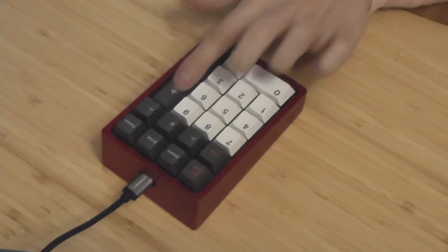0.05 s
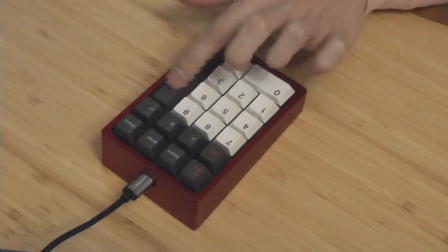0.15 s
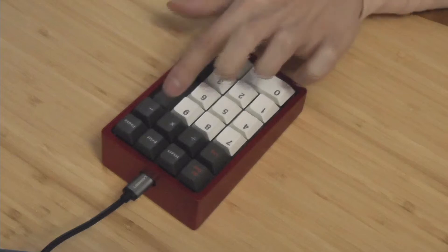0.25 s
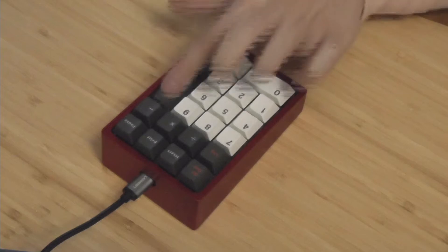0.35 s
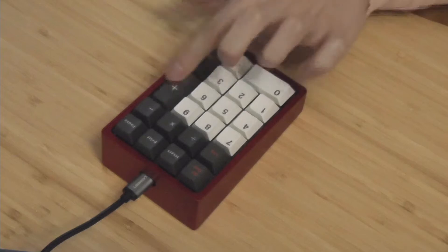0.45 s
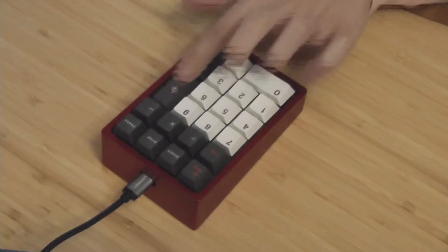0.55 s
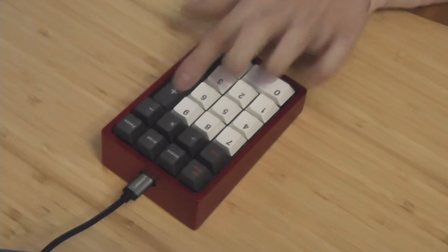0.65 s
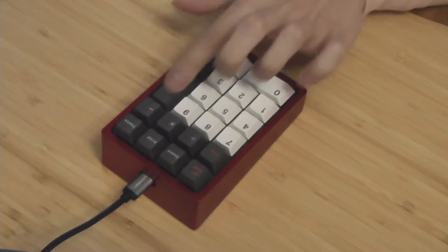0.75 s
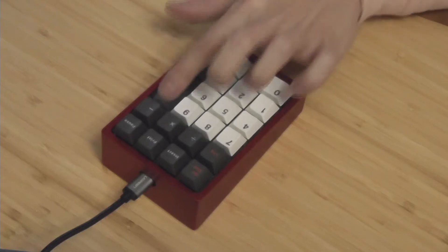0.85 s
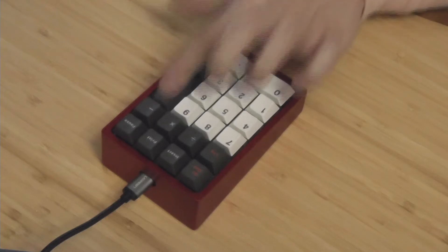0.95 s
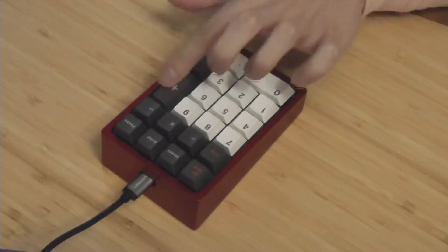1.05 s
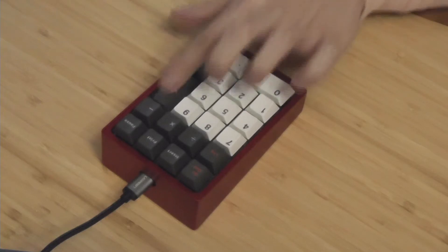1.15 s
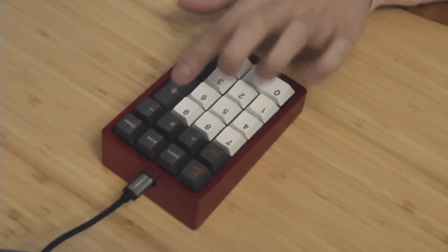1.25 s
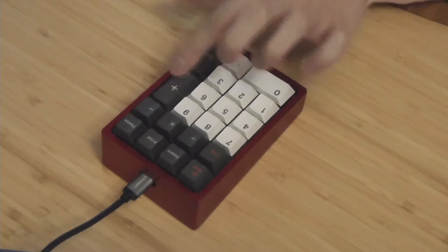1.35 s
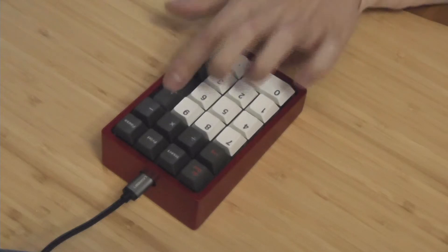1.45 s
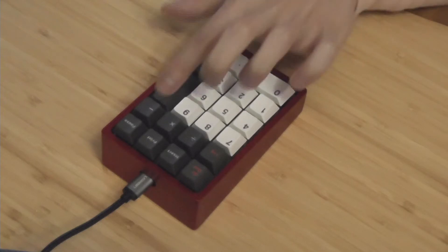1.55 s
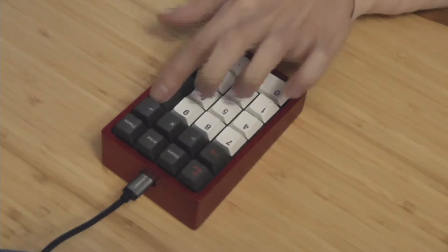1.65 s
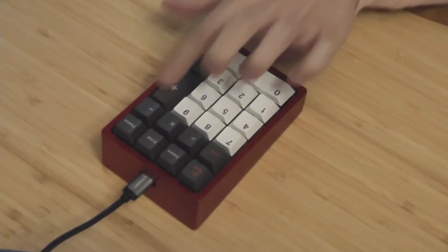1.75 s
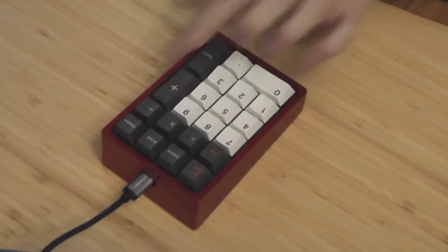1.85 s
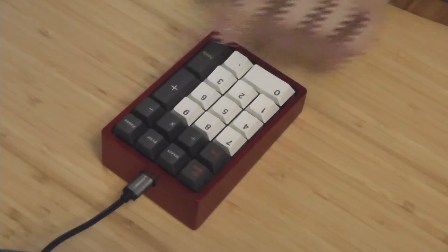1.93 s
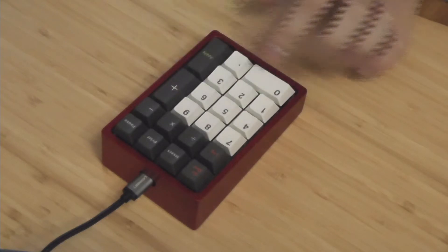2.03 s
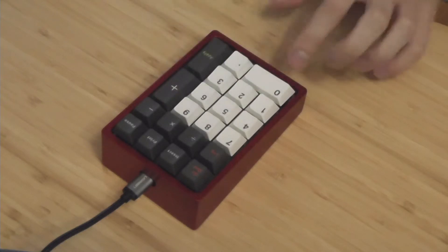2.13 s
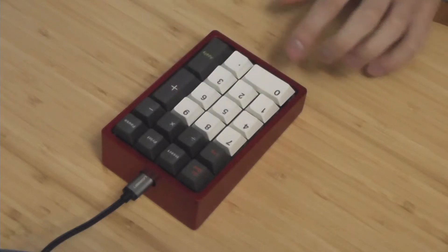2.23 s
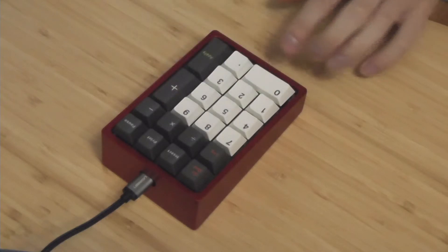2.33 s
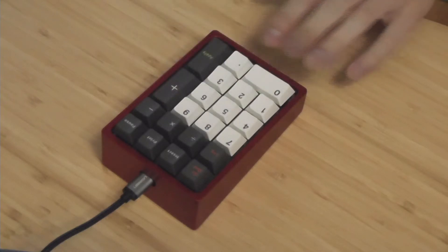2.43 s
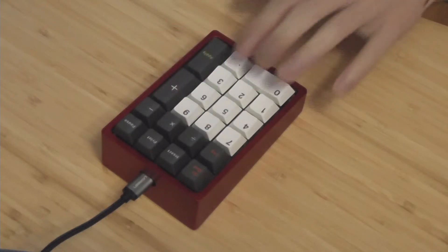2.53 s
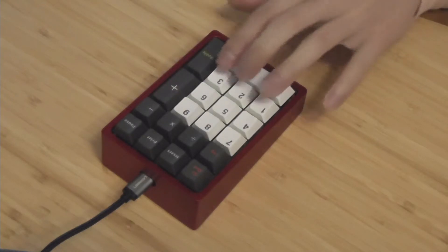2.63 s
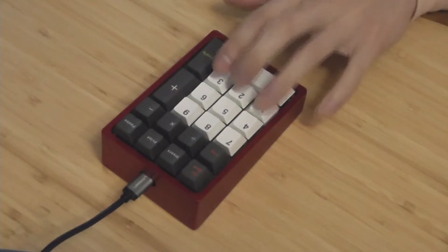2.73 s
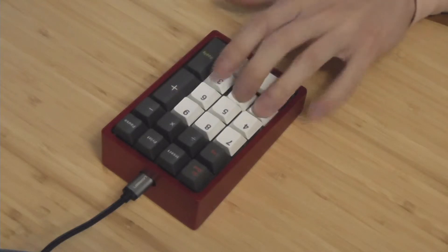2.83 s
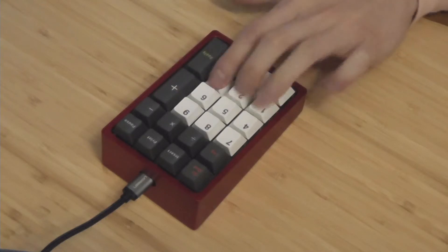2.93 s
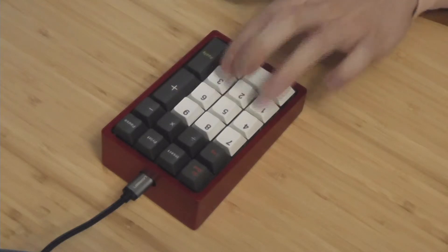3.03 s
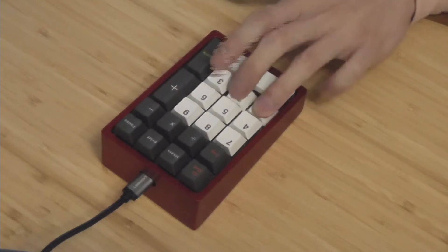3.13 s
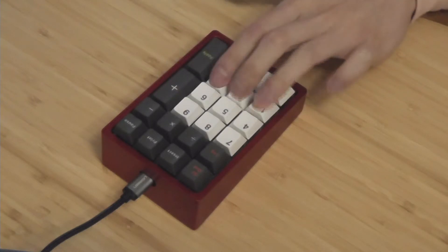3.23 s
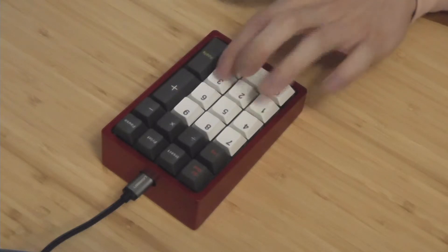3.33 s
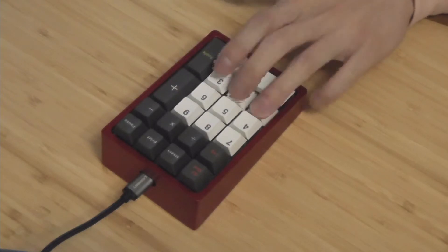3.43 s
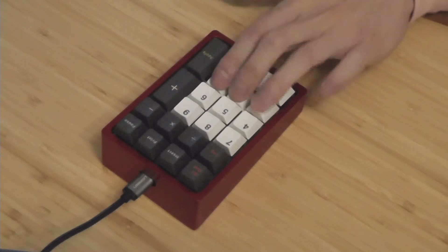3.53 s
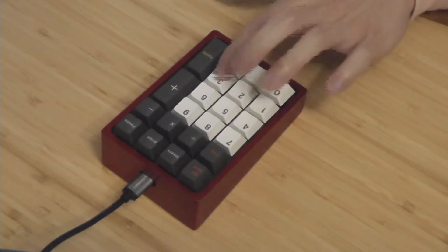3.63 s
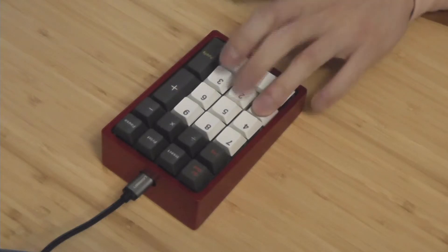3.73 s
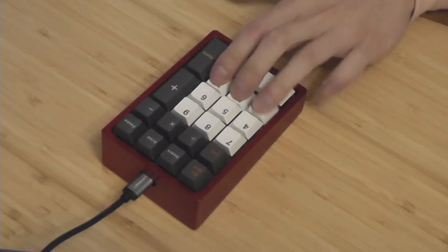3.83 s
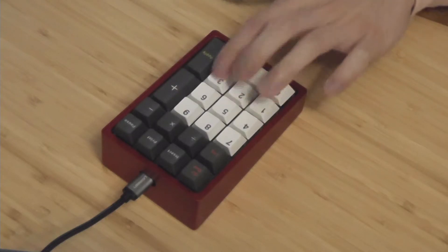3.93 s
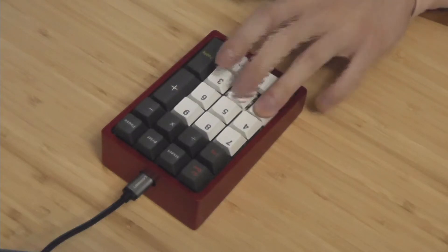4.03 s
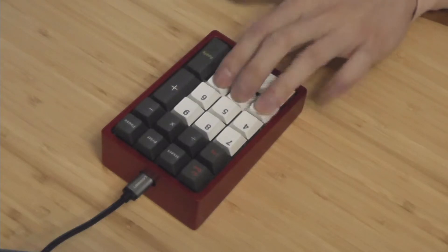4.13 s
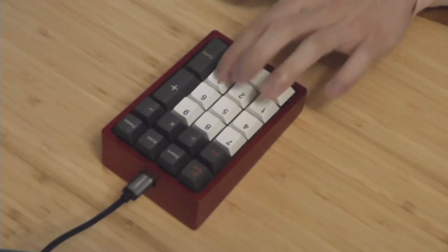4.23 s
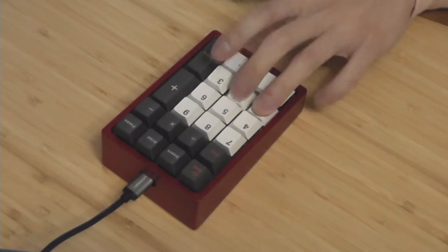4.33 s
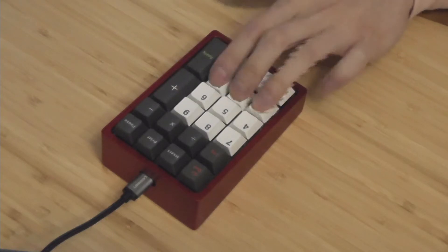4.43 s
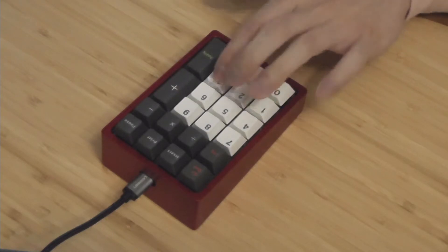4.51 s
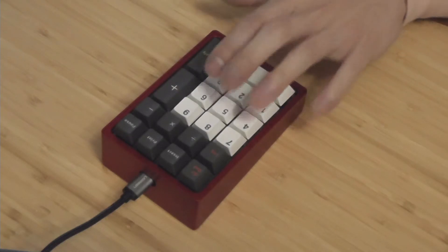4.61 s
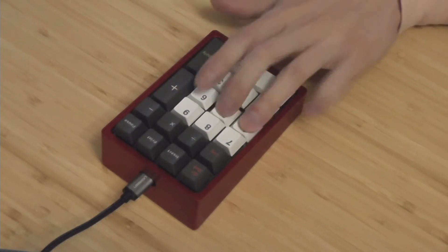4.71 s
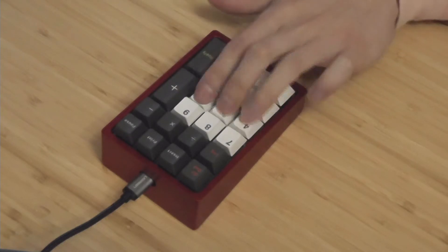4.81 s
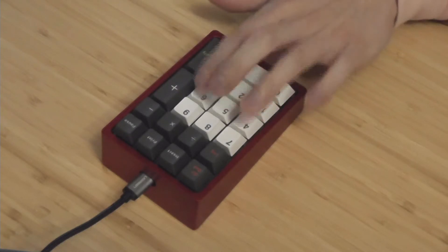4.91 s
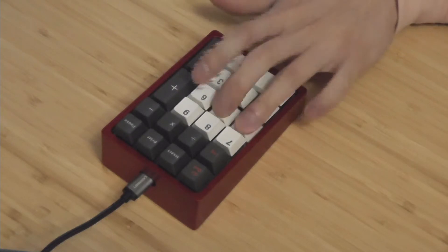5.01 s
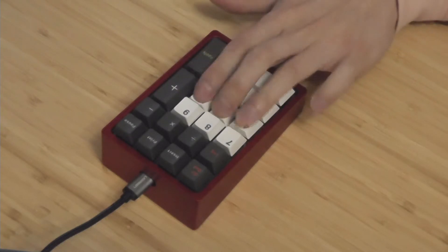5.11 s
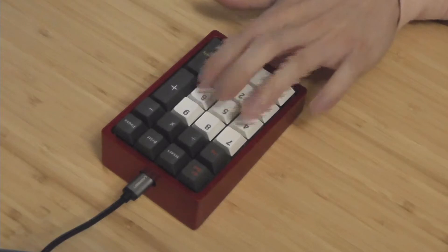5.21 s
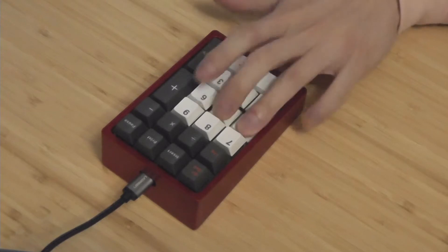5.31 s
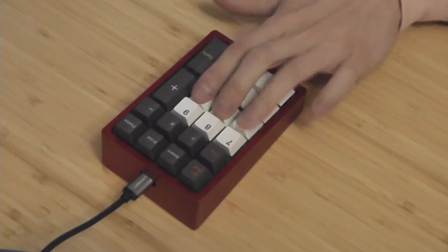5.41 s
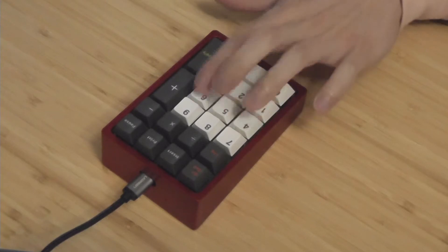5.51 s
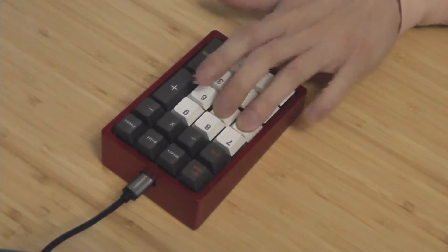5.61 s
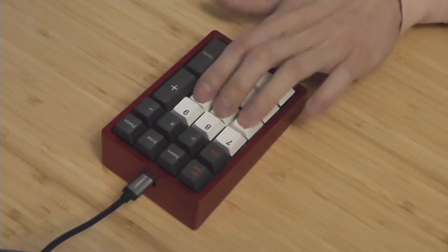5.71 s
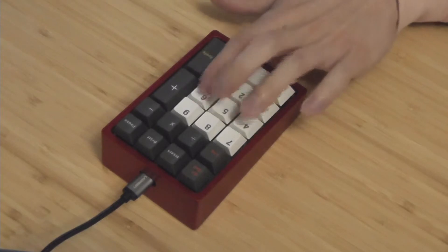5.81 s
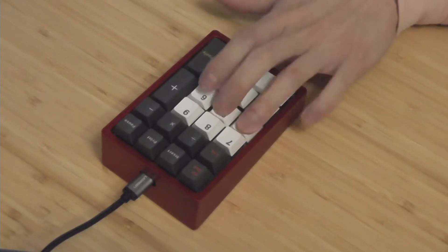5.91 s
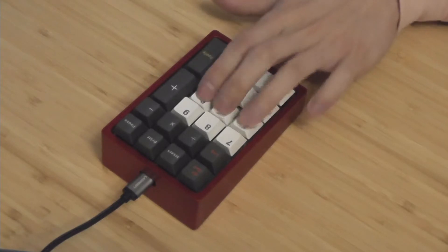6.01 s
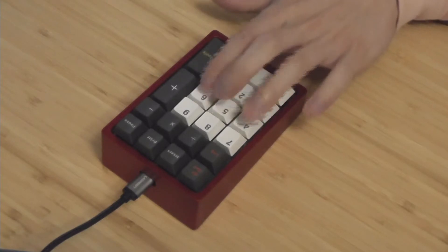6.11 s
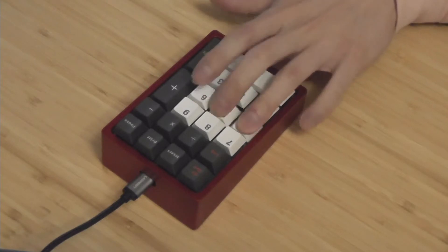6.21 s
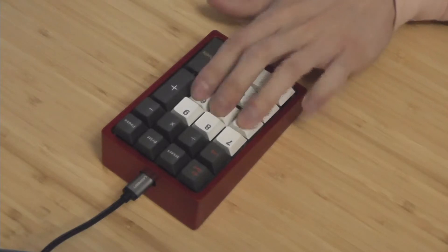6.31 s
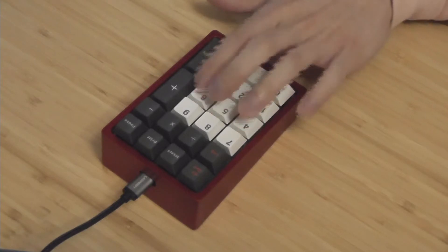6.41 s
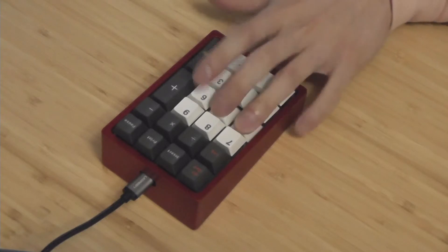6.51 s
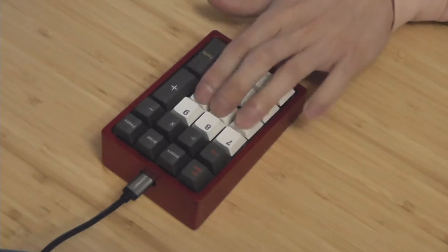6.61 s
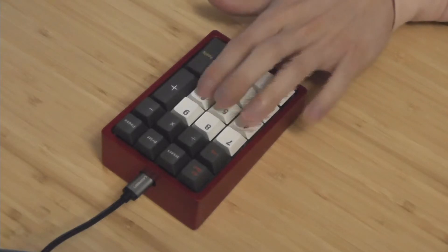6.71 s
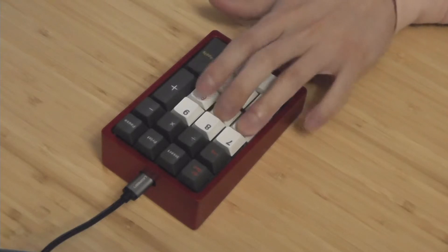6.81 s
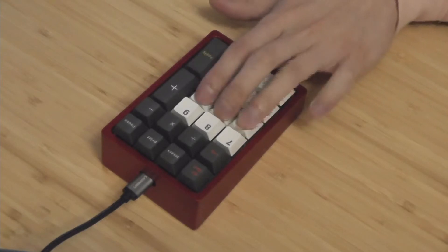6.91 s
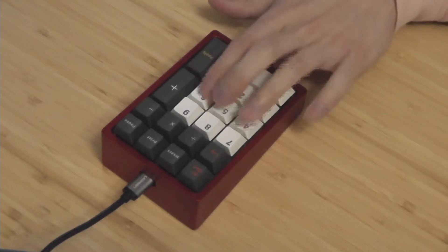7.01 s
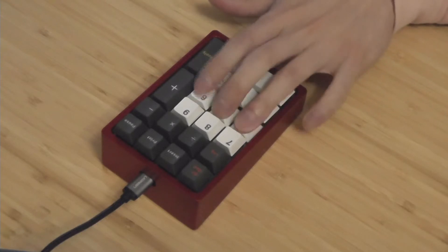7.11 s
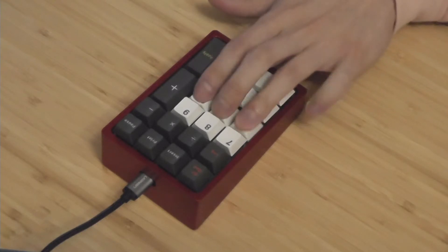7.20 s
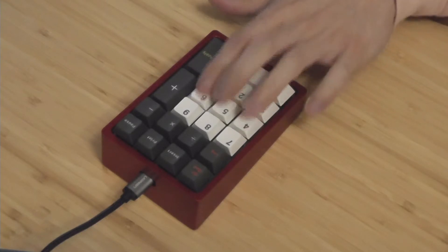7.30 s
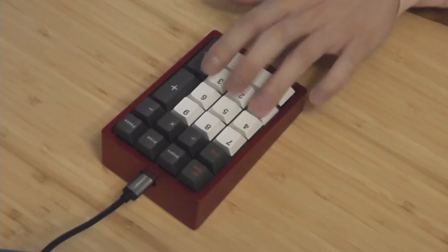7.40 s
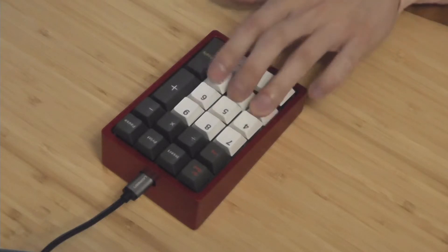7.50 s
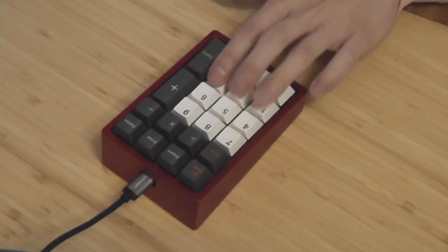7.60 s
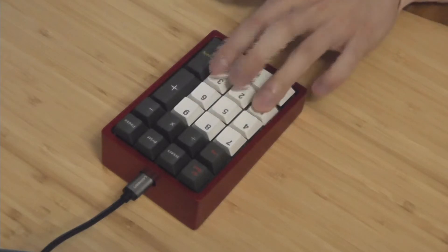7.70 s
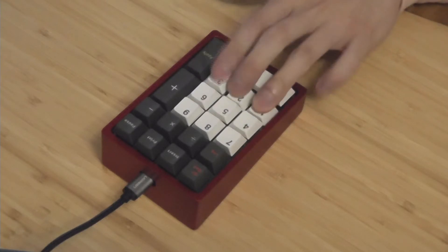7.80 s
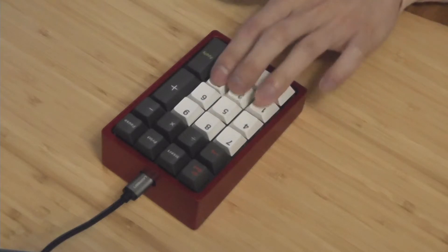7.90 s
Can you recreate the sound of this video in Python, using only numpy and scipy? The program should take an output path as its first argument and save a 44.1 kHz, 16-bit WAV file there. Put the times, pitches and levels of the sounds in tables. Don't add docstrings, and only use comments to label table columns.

```python
import sys
import numpy as np
from scipy import signal
from scipy.fft import rfft, irfft, next_fast_len
from scipy.io import wavfile
from scipy.ndimage import uniform_filter1d, map_coordinates

SR = 44100
rng = np.random.default_rng(int(sys.argv[2]) if len(sys.argv) > 2 else 0)


def to_wav(sig):
    pcm = np.clip(np.atleast_2d(sig), -1, 1) * 32767
    pcm = np.round(pcm).astype(np.int16)
    wavfile.write(sys.argv[1], SR, pcm.T)


def level_to_linear(level):
    exponent = np.asarray(level, float) / 20
    return 10 ** exponent


N = 350595

# frequency in Hz, width in Hz, level in dB.
CLACK_MODES = [(1750, 810, -4), (1890, 298, 0.5), (2230, 11, -21), (2430, 120, -9), (2770, 35, -8),
               (3910, 3040, -9)]
# frequency in Hz, width in Hz, level in dB.
CAP = [(4150, 70, -0.5), (4960, 1500, -6.5), (6390, 1210, 0), (6540, 2330, -3.5)]
# frequency in Hz, width in Hz, level in dB.
SPRING = [(8920, 310, 1), (10070, 830, 0.5), (11000, 590, -4)]
# frequency in Hz, width in Hz, level in dB.
BOARD = [(44, 51, -2), (80.05, 11.2, 0.5), (145.5, 20, -3), (168, 26.3, -4), (276, 16, -10), (363, 38, -38)]
# frequency in Hz, width in Hz, level in dB.
PANEL = [(244.8, 27, 1), (266.6, 36, -0.5), (362.5, 12.7, 0), (452, 250, -16.5), (558, 49, -10),
         (950, 1200, -18.5)]
# frequency in Hz, width in Hz, level in dB.
WIDE_CAP = [(3720, 390, -0.5), (4820, 1300, -2), (5220, 420, -3.5), (5660, 170, -2), (6900, 1500, -9.5)]
# frequency in Hz, width in Hz, level in dB.
WIRE = [(8330, 220, -1), (9630, 310, -6.5), (11400, 1700, -10.5)]
# frequency in Hz, width in Hz, level in dB.
EDGE = [(10990, 2200, -8.5), (15400, 1200, -10.5)]
# delay in seconds, level in dB.
NEAR_ECHO = (.00579, -7.5)

# time in seconds, sway in dB.
HAND_SWAY = [(0, -30.5), (.2, -48), (.26, -41), (.9, -36), (1.0, -42), (1.15, -39), (1.35, -36),
             (1.53, -45.5), (1.72, -34.5), (1.92, -47.5), (2.32, -66), (2.8, -48.5), (2.92, -80),
             (3.3, -42), (5.4, -42), (6.33, -46), (7.5, -59), (7.95, -46)]
# time in seconds, strength in dB.
PALM_RUB = [(0.0, -60), (0.26, -64), (1.26, -67), (1.55, -66.5), (1.88, -86.5), (2.48, -84), (2.68, -81),
            (2.79, -67), (3.54, -66), (3.74, -70.5), (4.45, -72.5), (4.67, -72), (5.4, -75.5), (6.24, -75),
            (6.53, -77), (7.95, -79)]
# start in seconds, clack peak in dB, clack in Hz, tick in dB, thump in dB.
BRUSH = [
    (2.568, -68, 1390, -38.5, 6),
    (7.284, -56, 1500, -19, -9),
    (7.313, -57.5, 2700, -34, 10),
]
# start in seconds, clack peak in dB, clack in Hz, tick in dB, thump in dB.
WIDE_PRESS = [(0.013, -39.5, 1940, 1, 6.5), (0.028, -23, 1890, -14.5, -10), (0.1147, -21, 2430, -7.5, -15),
              (0.2596, -17.5, 1890, -4.5, -12.5), (0.3221, -23, 1910, -17, -14.5),
              (.389, -16, 2430, -10, -16.5), (0.4588, -24.5, 1890, -11.5, -11),
              (0.5475, -15.5, 2430, -9, -17.5), (0.6792, -34.5, 2440, -7.5, -8.5),
              (0.701, -24, 1810, -14, -16), (.7693, -27.5, 1830, -9.5, -6), (0.851, -31.5, 3800, -6, -10),
              (0.8591, -15, 3100, -3.5, -12), (0.9845, -37.5, 2180, -3, 0.5),
              (0.9981, -22.5, 2310, -10.5, -14), (1.0602, -50.5, 2400, -35.5, 6),
              (1.3087, -18.5, 2430, -11, -11.5), (1.5487, -24.5, 1890, -17, -11.5)]
# start in seconds, clack peak in dB, clack in Hz, tick in dB, thump in dB.
FIRM_PRESS = [(2.592, -53.5, 1400, -26.5, 5), (2.614, -49, 1870, -23, -3.5),
              (2.7152, -40, 1900, -12.5, 1.5), (2.761, -25.5, 2580, -6.5, -5.5),
              (2.856, -29.5, 1810, -21, -8), (2.951, -24, 2770, -11, -6), (3.0771, -33, 1960, -8, 0),
              (3.2747, -30.5, 2400, -13, 2), (3.3146, -39, 2700, -7, 6), (3.4003, -26.5, 2400, -7, -7.5),
              (3.5015, -29.5, 2450, -20, -18), (3.5968, -31, 2420, -14, 5), (3.64, -27.5, 3220, -7, -1.5),
              (3.7036, -33.5, 2900, -9, -9), (3.81, -26, 2610, -16.5, -12),
              (3.8995, -23.5, 2450, -9, -11.5), (3.9257, -36.5, 2180, -14, -4.5),
              (3.9838, -37.5, 2770, -19, -3), (4.1103, -28, 2400, -18, -9.5),
              (4.1828, -25.5, 2500, -12.5, -6.5), (4.2283, -39.5, 2780, -8.5, 4),
              (4.289, -31.5, 2550, -9, -4), (4.3322, -40.5, 2700, -23, 5.5),
              (4.4014, -33, 1660, -16.5, -11)]
# start in seconds, clack peak
# in dB, clack in Hz, tick in dB, thump in dB.
EASY_PRESS = [(4.56, -18.5, 2510, -11.5, -8), (4.656, -45.5, 1860, -29, 9), (4.7011, -42.5, 1800, -32, 1.5),
              (4.91, -43, 2400, -20.5, -2), (4.9918, -55, 1940, -18, 16.5), (5.0124, -36.5, 1700, -31, -6),
              (5.1689, -33, 2590, -28, -1.5), (5.2115, -43.5, 1800, -10.5, 8),
              (5.2796, -49, 2770, -12.5, 10), (5.328, -51, 3100, -23, -14),
              (5.3989, -28.5, 1890, -16.5, -17), (5.4808, -21.5, 2720, -10.5, -5),
              (5.566, -47, 2700, -21, -5), (5.6267, -40, 2770, -27, -24), (5.769, -29.5, 2580, -20.5, -11),
              (5.8188, -44, 1890, -17, 6), (5.8525, -50, 2160, -21, 8), (5.9174, -45.5, 2770, -37, -2.5),
              (5.951, -35.5, 2430, -23, -8.5), (5.9898, -27.5, 1890, -42, -21),
              (6.067, -50.5, 2770, -26, 9.5), (6.3766, -33, 2540, -12, -3.5), (6.4312, -51, 3140, -8, 14),
               (6.4617, -42.5, 1890, -23, -8), (6.522, -45.5, 1750, -45, -5.5), (6.559, -38, 2540, -41, -9),
               (6.6728, -34.5, 2740, -26, -11), (6.7485, -45.5, 2700, -19, -3.5),
               (6.9519, -33.5, 2570, -13, -10.5), (7.0124, -46.5, 3000, -6, -1),
               (7.072, -56.5, 2770, -18, 11.5), (7.1276, -42, 1780, -45, -9), (7.4349, -43, 2560, -32, -31),
               (7.5486, -40.5, 2500, -45, -15), (7.5775, -54, 2740, -39, -1),
               (7.6656, -35, 2150, -22.5, -13), (7.6947, -45, 2640, -44, 0.5),
               (7.723, -42.5, 2200, -25, -20), (7.801, -41, 2230, -59, -22)]
# start in seconds, clack peak in dB, clack in Hz, tick in dB.
LIGHT_STROKES = [(0.177, -24.5, 1830, -16), (.624, -28.5, 1870, -19), (.923, -30, 1890, -14.5),
                 (1.1565, -25, 2430, -17.5), (1.2279, -21.5, 3330, -9), (1.383, -37, 1720, -18),
                 (1.4278, -36.5, 1890, -16.5), (1.6292, -34, 1880, -10), (2.638, -28, 2440, -16),
                 (2.8193, -27, 2430, -18.5), (3.0169, -31.5, 2760, -9.5), (3.1069, -36.5, 2600, -19),
                 (3.1439, -31.5, 1720, -25), (3.1858, -33, 2540, -26.5), (3.462, -27, 2580, -11.5),
                 (3.743, -37.5, 1890, -15.5), (3.777, -30.5, 2400, -16.5), (4.036, -38.5, 2180, -21),
                 (4.074, -29.5, 2400, -20.5), (4.3633, -36, 2230, -29), (4.679, -49, 2240, -24),
                 (4.745, -32, 2410, -11), (4.7845, -28.5, 1890, -24), (4.8729, -32.5, 2600, -33),
                 (5.06, -33, 2460, -22.5), (5.097, -26.5, 1890, -17), (5.3625, -33.5, 2500, -12),
                 (5.5924, -56, 2770, -27), (5.6522, -30.5, 2230, -11.5), (5.708, -28.5, 1890, -28),
                       (6.1027, -38.5, 1900, -21.5), (6.1284, -47.5, 1890, -19.5), (6.2228, -38.5, 1760, -32),
                       (6.262, -41, 1710, -31), (6.291, -31.5, 1890, -23.5), (6.6023, -31.5, 1890, -40),
                       (6.648, -44, 2640, -21), (6.8082, -37.5, 1850, -48), (6.849, -36, 1890, -31.5),
                       (6.9038, -40.5, 1890, -43), (7.1515, -38.5, 2330, -17), (7.2021, -34, 1930, -23.5),
                       (7.3586, -34.5, 2320, -19), (7.4535, -39, 2400, -35), (7.495, -35.5, 2600, -36.5),
                       (7.6242, -39, 2930, -29), (7.7552, -41, 2770, -30), (7.8642, -60, 1900, -14),
                       (7.8827, -35, 2770, -18.5)]
# start in seconds, peak in dB, pitch in Hz.
CHATTER = [(0.0155, -41, 5530), (0.2514, -32, 2370), (0.541, -41, 2200), (0.853, -36, 5610),
           (0.9855, -41, 6400), (1.0133, -45, 2200), (1.3015, -39, 2410), (1.5541, -47, 1930),
           (1.5628, -46, 1970), (2.793, -39, 1720), (2.9483, -43, 1780), (3.0028, -40, 1780),
           (3.067, -46, 2810), (3.1271, -43, 1700), (3.279, -46, 2720), (3.313, -46, 2680),
           (3.3287, -35.5, 2640), (3.3355, -34, 5280), (3.392, -35, 2230), (3.4272, -36, 2810),
           (3.4446, -38, 1630), (3.5998, -33, 3000), (4.003, -42, 2500), (4.008, -46, 2360),
           (4.0384, -38, 2170), (4.23, -34, 2920), (4.357, -52, 1770), (4.3636, -31, 2680),
           (4.5917, -37, 2120), (4.8884, -51, 1990), (4.9759, -57, 3090), (5.1594, -43, 2590),
           (5.172, -40, 1720), (5.179, -45, 2620), (5.209, -57, 1890), (5.2258, -45, 2300),
           (5.2915, -47, 9000), (5.3303, -39, 1830), (5.3379, -38, 2630), (5.5912, -48, 1970),
           (5.7555, -52, 1650), (5.7756, -38, 3050), (5.958, -44, 2590), (6.1774, -60, 2760),
           (6.2978, -42, 1930), (6.3854, -37, 2750), (6.4904, -60, 1880), (6.6923, -45, 1850),
           (6.715, -47, 2720), (6.844, -48, 3500), (6.9554, -43, 2650), (6.9598, -44, 2540),
           (6.981, -51, 1840), (7.0064, -57, 3530), (7.068, -45, 9000), (7.1653, -45, 1790),
           (7.5, -46, 2670), (7.5809, -45, 2720), (7.6976, -40, 2720), (7.8958, -44, 1500)]
# time in seconds, keycap in Hz, spring in Hz.
KEY_PITCH = [(0.029, 3580, 10460), (0.115, 5900, 8000), (0.178, 3640, 9000), (0.26, 3420, 8400),
             (0.323, 3640, 8010), (0.389, 5700, 7940), (0.46, 3560, 9600), (0.548, 5800, 9470),
             (0.625, 3670, 8180), (0.68, 5800, 8100), (0.701, 3500, 8230), (0.77, 6570, 8090),
             (0.861, 6770, 8400), (0.923, 4120, 8200), (1.0, 3740, 8490), (1.157, 3610, 7800),
             (1.229, 3630, 9200), (1.309, 3750, 8600), (1.549, 7200, 12000), (1.63, 3840, 7900),
             (2.639, 7240, 9000), (2.763, 5100, 10300), (2.82, 7650, 8900), (2.857, 4060, 8820),
             (2.953, 4400, 9050), (3.017, 4430, 9700), (3.078, 3750, 10500), (3.276, 5520, 9380),
             (3.336, 5280, 9220), (3.401, 3900, 8500), (3.463, 3570, 8800), (3.502, 3620, 10150),
             (3.605, 5190, 10690), (3.646, 4900, 9690), (3.704, 3800, 9160), (3.778, 3960, 10100),
             (3.81, 3980, 10100), (3.9, 7430, 10700), (3.923, 7560, 10790), (4.075, 6050, 9000),
             (4.111, 3630, 10680), (4.184, 3840, 8350), (4.23, 3950, 8200), (4.289, 3530, 9120),
             (4.401, 3670, 11300), (4.561, 3850, 10060), (4.587, 3710, 9630), (4.746, 3640, 9600),
             (4.785, 5600, 9300), (5.099, 5500, 9820), (5.369, 3630, 9200), (5.4, 5300, 9700),
             (5.482, 5070, 10200), (5.653, 3580, 10070), (5.99, 3610, 9700), (6.291, 3610, 8300),
             (6.379, 5760, 10160), (6.954, 4400, 9400), (7.36, 4130, 9800), (7.666, 4100, 9840)]

LEAD = 600
WIDE_UNTIL_S = 2
LOOSE_FROM_S = 4.6
TIGHT_DB, WIRE_DB = -2.5, -7
LIGHT_THUMP_DB = -22
LIGHT_SPRING_DB = -2.5
SPRING_DB, SPRING_PER_TICK, SPRING_PER_DB = -5, 1, 0.19
SCRAPE_DB = -81
SOFT_BELOW_DB, SOFT_PER_DB = -38, 0.5
SLIDE_DB, SLIDE_DB_PER_S = -22.5, 2800
RATTLE_DB, NUDGE_DB = 6.5, 5
RUB_SLOW_DB, RUB_FAST_DB = 1.5, 3.5


def unit(x):
    return x / np.sqrt(np.mean(x ** 2) + 1e-20)


def curves(rows):
    s, *cols = np.transpose(rows)
    return [np.interp(np.arange(N) / SR, s, c) for c in cols]


def wobble(rate):
    knots = rng.standard_normal(int(N * rate / SR) + 4)
    return map_coordinates(knots, [np.arange(N) * rate / SR])


def modes(table, f):
    total = 0
    for k, (center, width, db) in enumerate(table):
        damping = 1j * f * width
        total = total + (-1) ** k * level_to_linear(db) * damping / (center * center - f * f + damping)
    return total


def highpass(f, corner_hz):
    return 1j * f / (corner_hz + 1j * f)


def filtered(x, response):
    m = next_fast_len(x.shape[-1] + 1024)
    spectrum = rfft(x, m) * response(np.fft.rfftfreq(m, 1 / SR))
    return irfft(spectrum, m)[..., :x.shape[-1]]


def strokes():
    presses = [(*row, 0) for row in WIDE_PRESS + FIRM_PRESS + EASY_PRESS]
    lights = [(*row, LIGHT_THUMP_DB, LIGHT_SPRING_DB) for row in LIGHT_STROKES]
    brushes = [(*row, 0) for row in BRUSH]
    s, db, hz, tick_db, thump_db, extra_db = np.transpose(sorted(presses + lights) + brushes)
    struck = level_to_linear(SPRING_DB + SPRING_PER_TICK * tick_db + SPRING_PER_DB * (db + 31))
    scraped = level_to_linear(np.minimum(SCRAPE_DB - db, -9) + 0.68 * extra_db) * (s > LOOSE_FROM_S)
    spring_db = 20 * np.log10(struck + scraped) + extra_db
    spring_db = spring_db + WIRE_DB * (s < WIDE_UNTIL_S) + TIGHT_DB * (s < LOOSE_FROM_S)
    return np.transpose([s, db, hz, tick_db, spring_db, thump_db])


def each_before(moment_s):
    return (strokes()[:, 0] < moment_s)[:, None, None]


def shaken(strength_db, settle_s):
    kicks = np.bincount(np.round(strokes()[:, 0] * SR).astype(int), level_to_linear(strength_db), N)[:N]
    t = np.arange(SR // 2) / SR / settle_s
    swell = t * np.exp(1 - t)
    return np.abs(signal.fftconvolve(kicks, swell)[:N])


def varied(table, f, spread_db):
    each = np.array([(-1) ** k * modes([m], f) for k, m in enumerate(table)])
    strength = level_to_linear(spread_db * rng.standard_normal((len(strokes()), len(table))))
    return (strength @ each)[:, None]


def pitch_of(column, width_hz, db, f):
    table, s = np.array(KEY_PITCH), strokes()[:, 0]
    row = np.abs(s[:, None] - table[:, 0]).argmin(1)
    known = np.abs(s - table[row, 0]) < .008
    hz = table[row, column][:, None, None]
    return known[:, None, None] * modes([(hz, width_hz, db)], f)


def place(rows, peak_db):
    peak = np.abs(rows.mean(1)).max(-1)[:, None, None]
    rows = rows / peak * level_to_linear(peak_db)[:, None, None]
    out = np.zeros((2, N + SR))
    for s, row in zip(strokes()[:, 0], rows):
        out[:, round(s * SR):][:, :row.shape[1]] += row
    return out[:, LEAD:N + LEAD]


def hand():
    sway_db, = curves(HAND_SWAY)
    s, db, _, _, _, thump_db = strokes().T
    wide = s < WIDE_UNTIL_S
    board_gain = level_to_linear(1.0 * sway_db - 35.0) + shaken(0.9 * (db + thump_db) - 28.0 - 5 * wide, 0.049)
    panel_gain = level_to_linear(curves(PALM_RUB)[0] - 2.5) + shaken(0.73 * db - 62.0 + 4 * wide, 0.069)
    a, b, c, d, e = rng.standard_normal((5, N))
    nudge = wobble(8.3)
    sway = unit(filtered(a, lambda f: modes([(25.54, 40.2, 0)], f) ** 2 / (1 + 1j * f / 60)))
    nudged = b * level_to_linear(NUDGE_DB * nudge)
    board = unit(filtered(nudged, lambda f: modes(BOARD[1:4], f) * modes([(98.0, 110, 0)], f)))
    rub = np.array([c + 0.6 * d, c + 0.93 * e])
    rub = rub * level_to_linear(RUB_SLOW_DB * nudge + RUB_FAST_DB * wobble(13))
    panel = filtered(rub, lambda f: modes(PANEL, f) * modes([(403, 1600, 0)], f) / (1 + 1j * f / 1200) ** 2)
    return level_to_linear(sway_db - 0.9) * sway + board_gain * board, panel_gain * unit(panel)


def rustle():
    s, db, _, _, spring_db, _ = strokes().T
    caps_gain = shaken(0.43 * db - 74.5, 0.027) + shaken(0.96 * db - 51.5, 0.045)
    coil_gain = shaken(0.2 * (db + spring_db) - 81 - 13 * (s < LOOSE_FROM_S), 0.059)
    coil_gain = coil_gain + level_to_linear(-90) * (np.arange(N) > LOOSE_FROM_S * SR)
    a, b, c, d = rng.standard_normal((4, N))

    def cap_body(f):
        return (modes(CLACK_MODES, f) + 0.19 * modes(CAP, f)) * modes([(3380, 11000, 0)], f)

    def coil_body(f):
        return modes(SPRING, f) * modes([(9180, 547, 0)], f) ** 2

    caps = filtered(np.array([a + .5 * b, a - .5 * b]), cap_body)
    coils = filtered(np.array([c + 0.34 * d, c - 0.5 * d]), coil_body)
    caps = caps_gain * unit(caps * level_to_linear(3.5 * wobble(45)))
    coils = coil_gain * unit(coils * level_to_linear(5.9 * wobble(37) + 3.1 * wobble(27)))
    return caps + coils * level_to_linear([[-1.5], [1.5]])


def chatter():
    s, db, hz = np.transpose(CHATTER)
    delay_s, echo_db = NEAR_ECHO
    t = np.arange(SR // 30) / SR
    decay = level_to_linear(-60 * t / 0.0043) + level_to_linear(-10 - 60 * t / 0.037)
    tap = rng.standard_normal((len(s), len(t))) * decay + 3 * (t == 0)
    tap = tap + level_to_linear(echo_db) * np.roll(tap, round(delay_s * SR), axis=1) * (t >= delay_s)

    def body(f):
        ring = modes([(hz[:, None], 500, 0)], f) + 0.28 * modes(CLACK_MODES, f) + 0.12 * modes(CAP, f)
        return ring * modes([(3500, 11500, 0)], f) ** 2

    out = np.zeros(N + SR)
    for at, peak_db, row in zip(s, db, filtered(tap, body)):
        out[round(at * SR):][:len(t)] += row / np.abs(row).max() * level_to_linear(peak_db - 1.0)
    return np.array([out[:N], np.roll(out, shift=3)[:N]])


def thocks():
    s, db, _, _, _, thump_db = strokes().T
    t = (np.arange(SR // 6) - LEAD) / SR
    envelope = level_to_linear(-60 * t / 0.079) * (1 - np.exp(-np.maximum(t, 0) / 0.0037))
    jolt = rng.standard_normal((len(db), 2, len(t))) * envelope
    shared = jolt + 0.22 * jolt[:, ::-1]
    rows = filtered(shared, lambda f: varied(PANEL, f, 3.4) * modes([(407, 2300, 0)], f))
    return place(rows, db + 0.44 * thump_db - 25.5 + 6.4 * (s < WIDE_UNTIL_S))


def thumps():
    s, db, _, _, _, thump_db = strokes().T
    t = (np.arange(SR // 5) - LEAD) / SR
    deep_hz = np.where(each_before(WIDE_UNTIL_S), 12, 90)
    push = np.exp(-((t - .0045) / 0.0019) ** 2)

    def desk(f):
        return (varied(BOARD, f, 4.5) + modes([(87, 470, -13)], f)) * highpass(f, deep_hz)

    rows = filtered(np.tile(push, (len(db), 1, 1)), desk)
    return place(rows, db + thump_db - 2.43 * (s > WIDE_UNTIL_S))


def strike(blow_t60, tail_db, tail_t60, alike, contact, right_lag):
    t = (np.arange(SR // 7) - LEAD) / SR
    after = np.maximum(t, 0)
    many = len(strokes())
    chance = rng.normal(0, 1, (many, 2))
    slide = level_to_linear(SLIDE_DB + 3 * chance[:, :1] + SLIDE_DB_PER_S * np.minimum(t, 0)) * (t < 0)
    hit = level_to_linear(-60 * after / blow_t60) * (t >= 0)
    blow = rng.standard_normal((many, len(t))) * (hit + slide)
    blow = blow + contact * (t == 0)
    delay_s, echo_db = NEAR_ECHO
    echoed = blow + level_to_linear(echo_db + 2 * chance[:, 1:]) * np.roll(blow, round(delay_s * SR), axis=1)
    near = np.stack([echoed, np.roll(echoed, right_lag, axis=1)], axis=1)

    a, b = rng.standard_normal((2, many, len(t)))
    grit = level_to_linear(RATTLE_DB * uniform_filter1d(rng.standard_normal((many, len(t))), size=30, axis=1))
    a, b = a * grit, b * grit
    u = np.arccos(np.clip(alike, 0, 1)) / 2
    diffuse = np.stack([np.cos(u) * a + np.sin(u) * b, np.cos(u) * a - np.sin(u) * b], axis=1)
    firm = level_to_linear(np.minimum(SOFT_PER_DB * (strokes()[:, 1] - SOFT_BELOW_DB), 0))[:, None, None]
    build_up = 1 - np.exp(-after * firm ** 2 / 0.00045)
    fade_out = 1 - (after / t[-1]) ** 4
    return firm * near + diffuse * level_to_linear(tail_db - 60 * after / tail_t60) * build_up * fade_out


def soft(f):
    return 1 / (1 + (1j * f / 11000) ** 2 + 1j * f / 11000) ** 3


def clack_body(f):
    hz = strokes()[:, 2][:, None, None]
    shell = varied(CLACK_MODES, f, 1.8) + modes([(hz, 350, 1.5)], f)
    return shell * (modes([(2400, 3440, 0)], f) / (1 + 1j * f / 5200)) ** 2


def cap_body(f):
    small = varied(CAP, f, 1.8) * modes([(5630, 31200, 0)], f) ** 2
    cap = np.where(each_before(WIDE_UNTIL_S), varied(WIDE_CAP, f, 1.8), small)
    cap = cap + pitch_of(column=1, width_hz=407, db=0.5, f=f)
    return cap * soft(f) * highpass(f, 3500) ** 2


def coil_body(f):
    _, db, _, tick_db, _, _ = strokes().T
    hard = level_to_linear(np.minimum(1.6 * (db + tick_db + 33.5), 2.5))[:, None, None]
    top = hard * modes(EDGE, f) * modes([(13660, 9400, -10.5)], f)
    spring = varied(SPRING, f, 1.8) * modes([(9610, 3400, 0.0033)], f) ** 2 * soft(f) + 0.86 * top
    spring = spring + each_before(LOOSE_FROM_S) * modes([(8790, 5000, -5.5)], f) ** 2
    wire = varied(WIRE, f, 1.8) + 1.2 * top + hard * modes([(15210, 1100, -2)], f) ** 2
    coil = np.where(each_before(WIDE_UNTIL_S), wire, spring)
    coil = coil + pitch_of(column=2, width_hz=350, db=3.5, f=f)
    return coil * highpass(f, 6000) ** 2


def keys():
    _, db, _, tick_db, spring_db, _ = strokes().T
    case_blow = strike(0.0035, tail_db=-14.5, tail_t60=0.13, alike=0.24, contact=5.78, right_lag=4)
    cap_blow = strike(0.0073, tail_db=-14.0, tail_t60=0.12, alike=0.1, contact=3.3, right_lag=2)
    coil_blow = strike(0.01, tail_db=-8.0, tail_t60=0.14, alike=0.32, contact=3.2, right_lag=0)
    clack = place(filtered(case_blow, clack_body), db - 3.0)
    tick = place(filtered(cap_blow, cap_body), db + tick_db + 4.0)
    ring = place(filtered(coil_blow, coil_body), db + spring_db + 5.5)
    return clack * level_to_linear([[-.1], [.1]]) + tick * level_to_linear([[-.7], [.7]]) + ring * level_to_linear([[-1.5], [1.5]])


def scene():
    low, panel = hand()
    desk_low = (low + thumps()) * level_to_linear([[2.4], [-3.2]])
    desk_panel = (panel + thocks()) * level_to_linear([[1.1], [-1.1]])
    return desk_low + desk_panel + rustle() + chatter() + keys()


def gate(x, floor_db, depth):
    z = signal.stft(x, nperseg=1024)[2]
    power = uniform_filter1d(np.mean(np.abs(z) ** 2, axis=0), size=9, axis=0)
    gain = (power / (power + level_to_linear(2 * floor_db))) ** depth
    return signal.istft(z * gain, nperseg=1024)[1][:, :N]


def roll_off(x):
    return signal.sosfilt(signal.butter(12, 16810, fs=SR, output="sos"), x)


def record(dry):
    hiss = level_to_linear(-112) * rng.standard_normal(dry.shape)
    rounded = dry / (1 + np.abs(dry / .36) ** 4) ** (1 / 4)
    quiet = gate(rounded, floor_db=-112, depth=2.2)
    finished = filtered(quiet + hiss, lambda f: f < 16700)
    return roll_off(finished)


dry = scene()
out = record(dry)
to_wav(out)
```